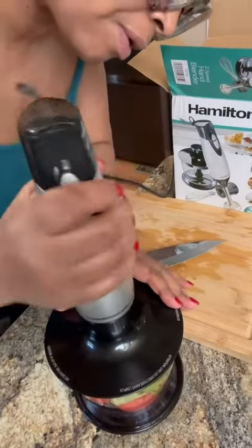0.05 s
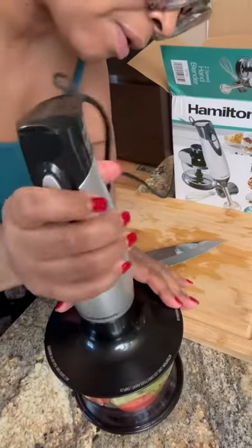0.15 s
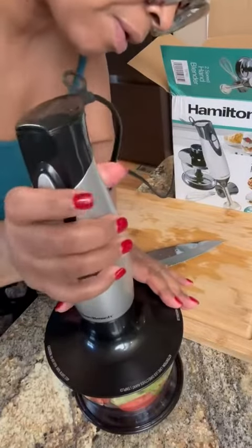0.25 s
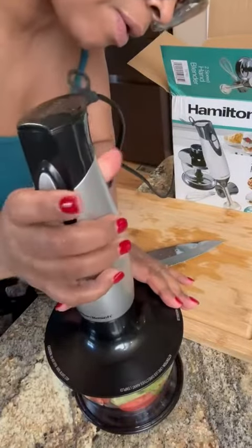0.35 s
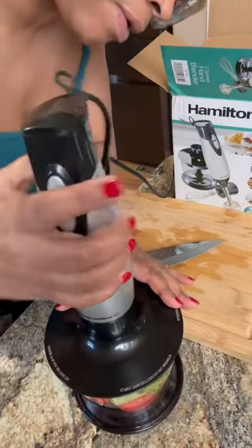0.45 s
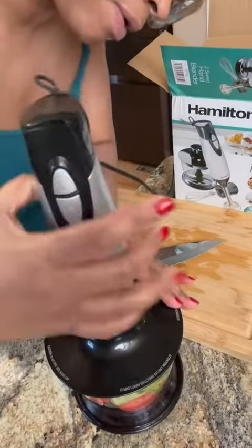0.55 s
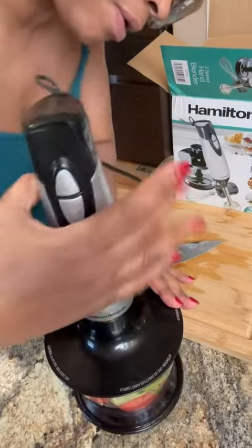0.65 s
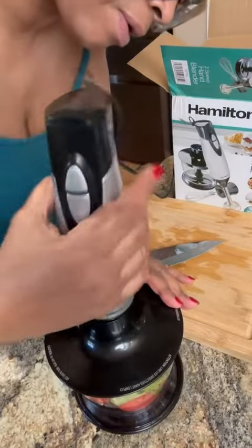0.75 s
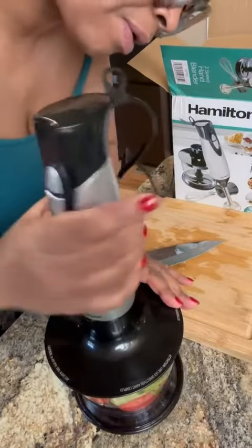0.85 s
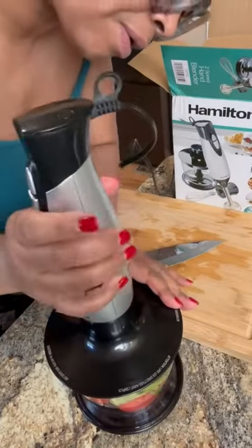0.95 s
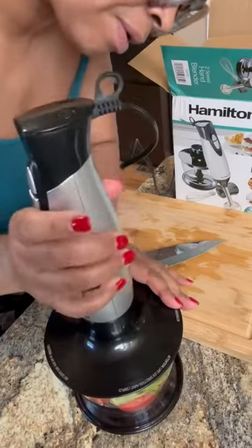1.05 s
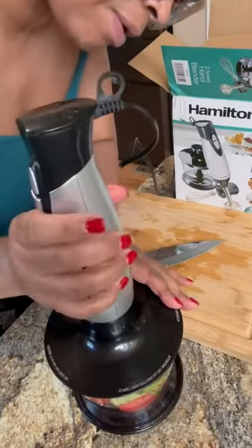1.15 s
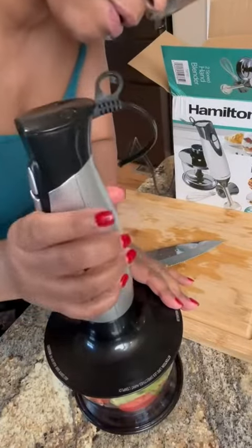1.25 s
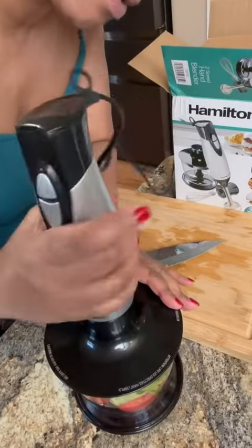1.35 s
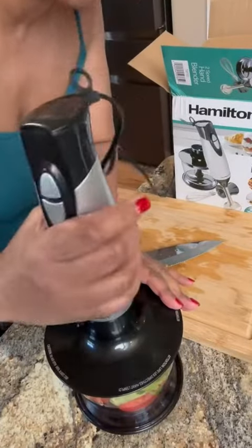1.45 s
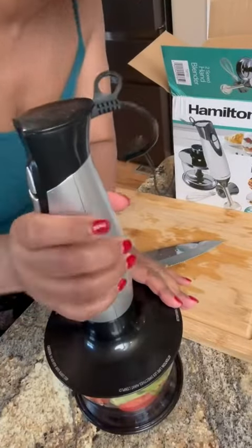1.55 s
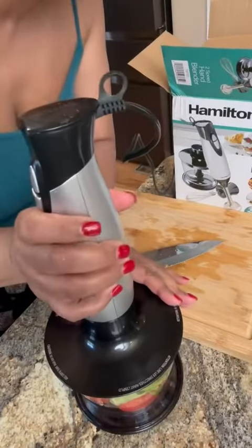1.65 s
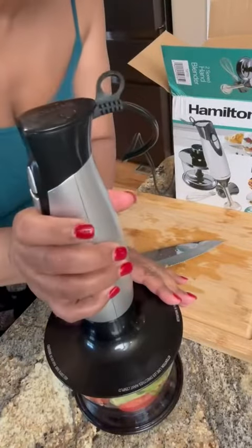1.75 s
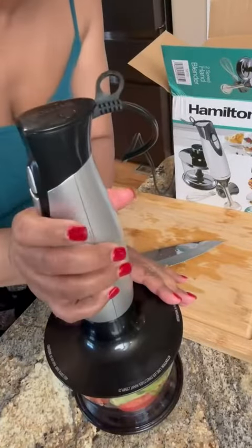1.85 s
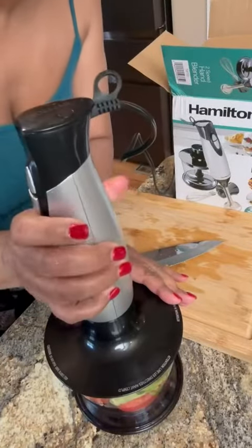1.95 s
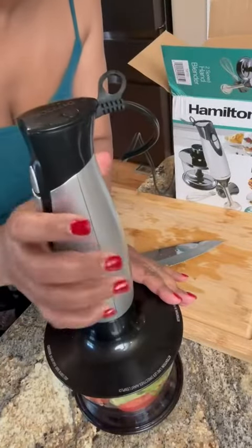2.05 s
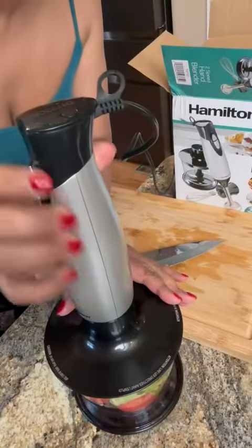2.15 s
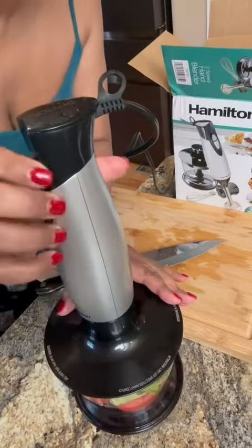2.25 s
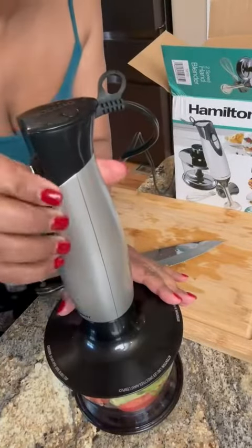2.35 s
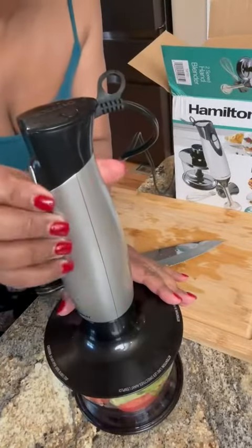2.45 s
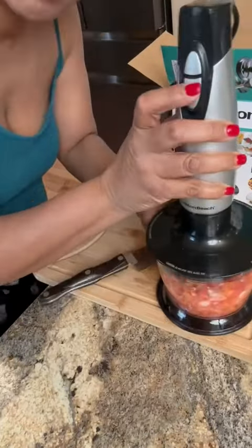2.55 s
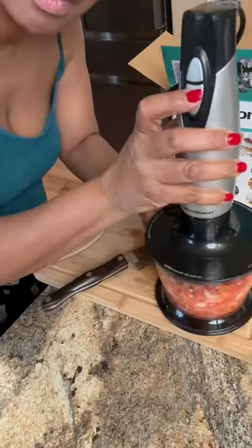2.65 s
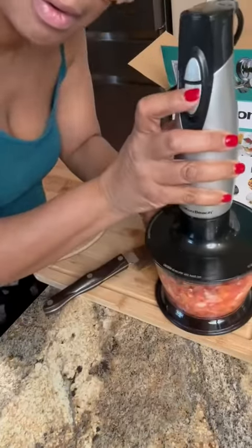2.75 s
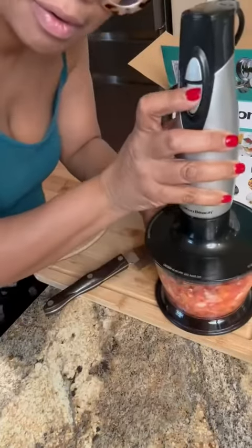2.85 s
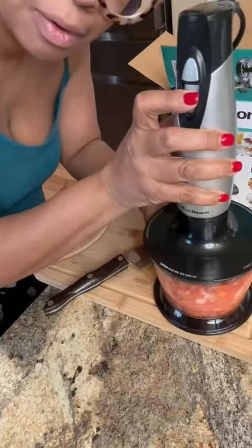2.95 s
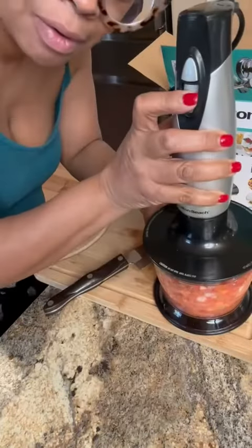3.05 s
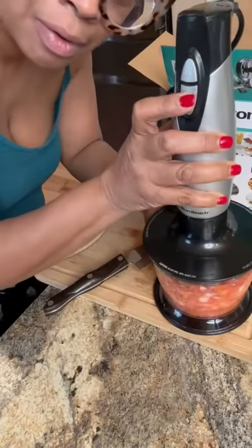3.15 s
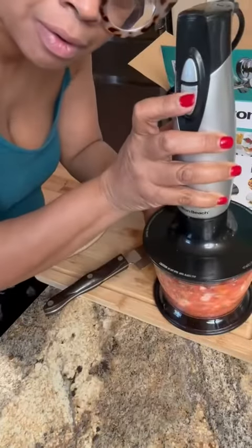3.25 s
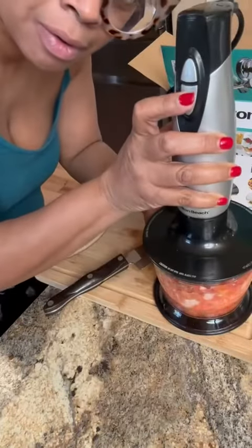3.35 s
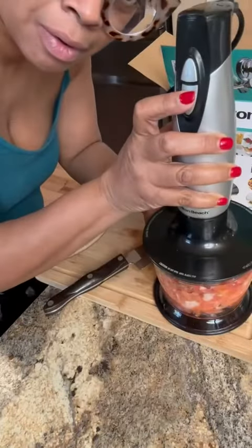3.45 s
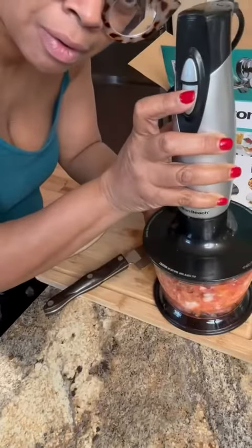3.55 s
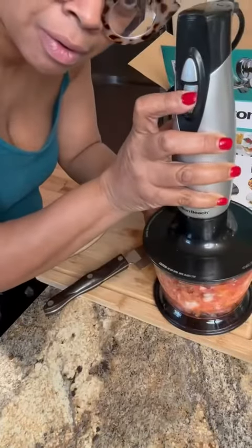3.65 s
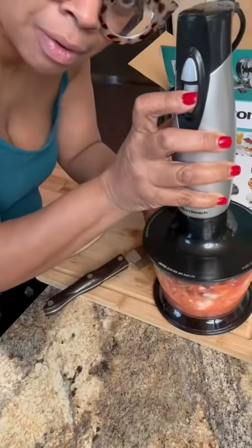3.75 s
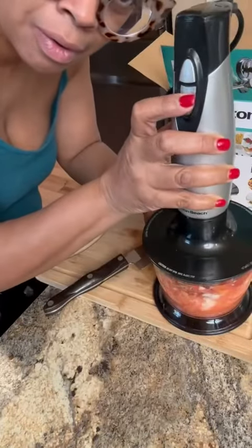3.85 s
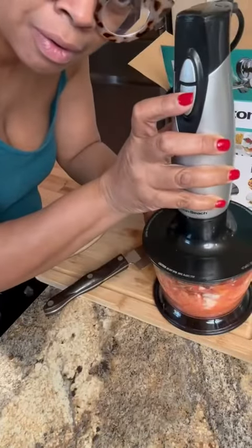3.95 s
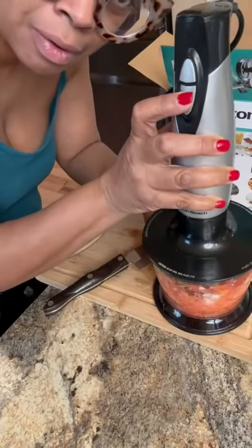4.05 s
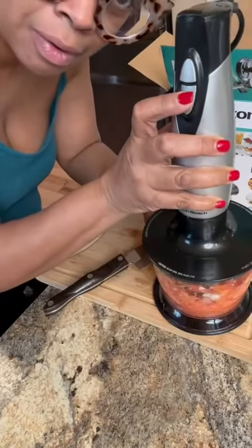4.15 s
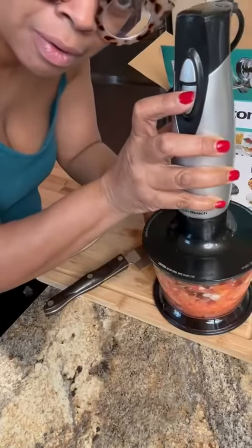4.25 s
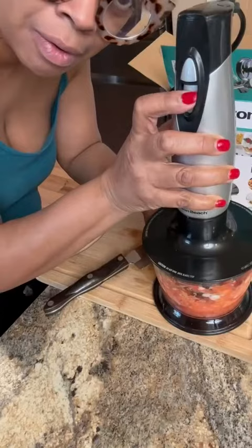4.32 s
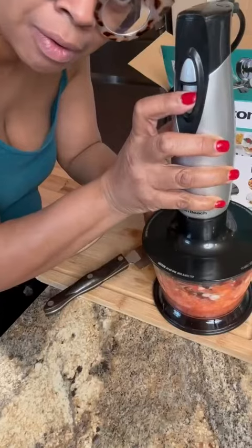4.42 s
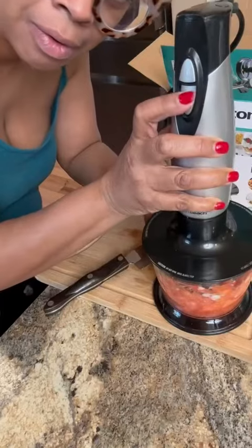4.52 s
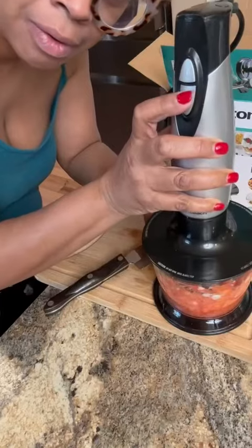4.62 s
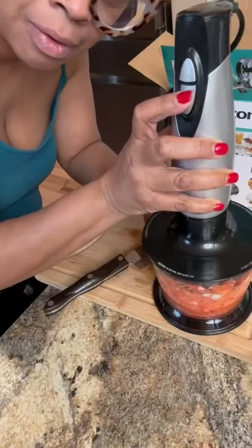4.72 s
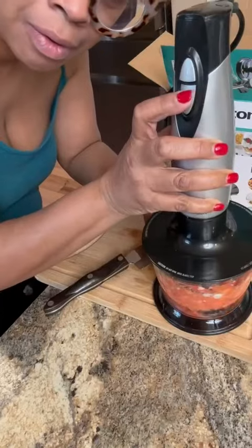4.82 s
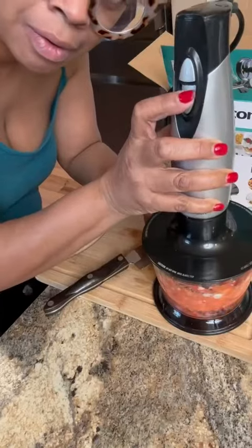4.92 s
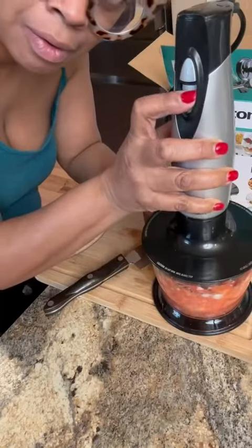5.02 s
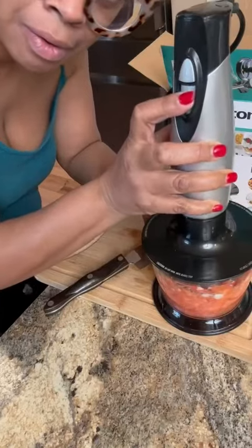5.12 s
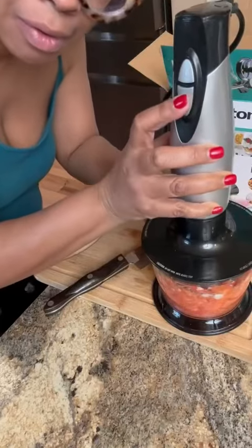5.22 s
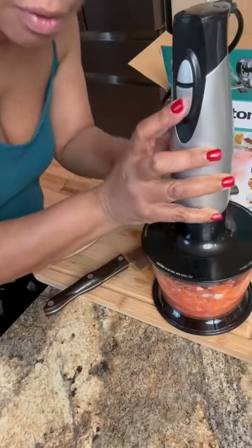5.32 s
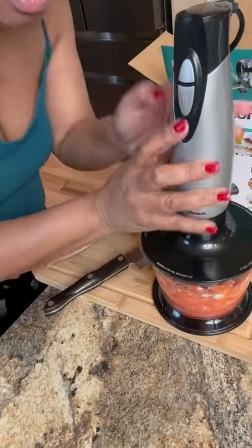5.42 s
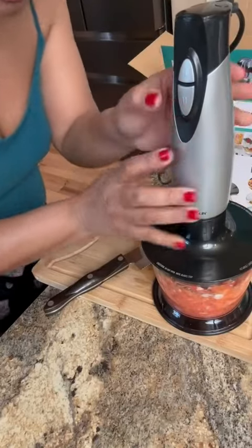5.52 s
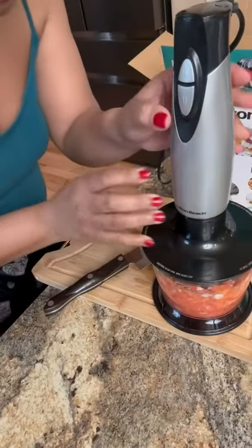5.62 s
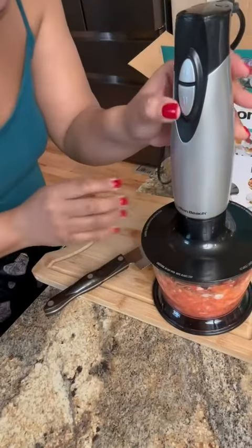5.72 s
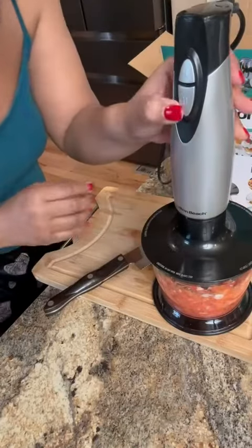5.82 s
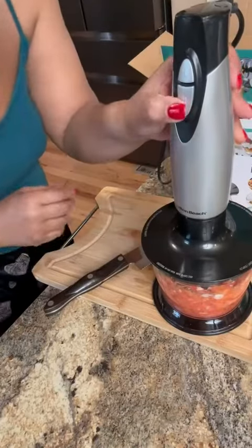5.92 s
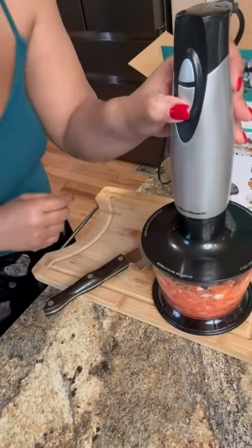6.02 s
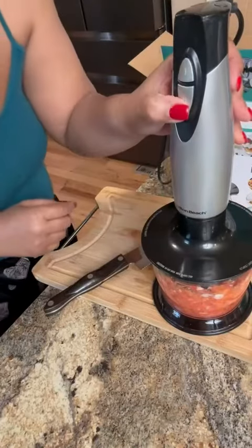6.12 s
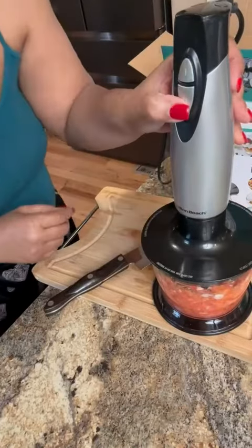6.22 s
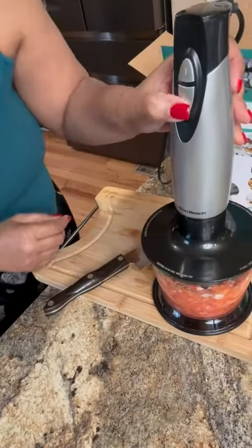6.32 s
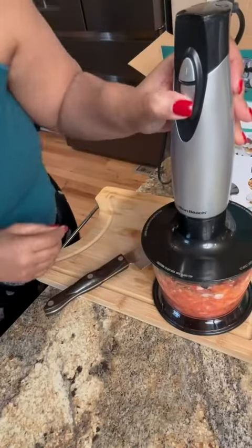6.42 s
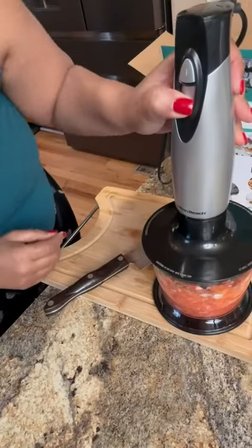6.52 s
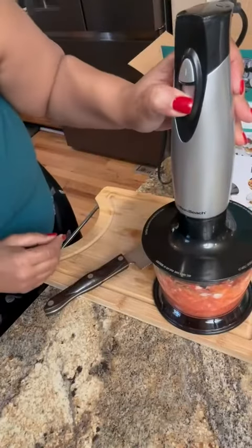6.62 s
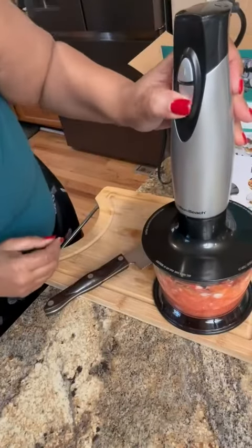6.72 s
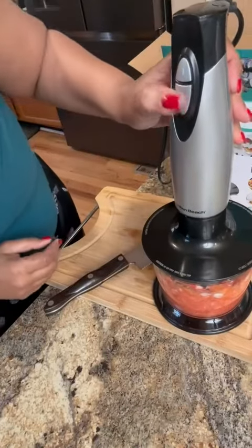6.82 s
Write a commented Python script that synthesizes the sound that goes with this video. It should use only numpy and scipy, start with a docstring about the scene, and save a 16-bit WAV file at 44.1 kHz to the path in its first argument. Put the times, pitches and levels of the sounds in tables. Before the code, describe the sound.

Close in a small kitchen, hands rub a plastic housing, then a hand blender knocks sharply onto its chopper lid, with the wooden board thumping beneath. After a pause, the motor pulses five times: switch click, rough lurch, clattering gears and blade, chunks hitting the bowl, then a slowing flutter. The fifth pulse follows a longer gap. Close stereo phone microphones, short room tail, faint hush.

```python
"""A small kitchen: a hand blender is twisted and knocked onto the lid of its chopper bowl, on a wooden board.
Then the motor is pulsed five times: random impacts through the bowl's resonances give gear and blade clatter,
filtered bursts give chunks on the wall, low tones give hum and rocking, and each run coasts down.
Near sounds, counter reflections, room tail and a faint hush reach two closely spaced phone microphones."""
import sys
import numpy as np
from scipy import signal
from scipy.fft import rfft, irfft
from scipy.io import wavfile
from scipy.ndimage import uniform_filter1d

SR = 44100
rng = np.random.default_rng(int(sys.argv[2]) if len(sys.argv) > 2 else 0)


def wav_out(sig):
    """Save sig, one row per channel (or a flat mono array), as 16-bit PCM at SR to the path in sys.argv[1]."""
    wavfile.write(sys.argv[1], SR, np.round(np.clip(np.atleast_2d(sig).T, -1, 1) * 32767).astype(np.int16))


N = 303408
T = np.arange(N) / SR
HZ = np.arange(N // 2 + 1) * SR / N
SHORT = 8192  # samples in one blow or body response
SHORT_T = np.arange(SHORT) / SR
SHORT_HZ = np.arange(SHORT // 2 + 1) * SR / SHORT + 1


def undb(db):
    """Decibels to gain."""
    return 10 ** (np.asarray(db) / 20)


def unit(x):
    """Scale to rms 1."""
    return x / np.sqrt(np.mean(x ** 2))


def along(points, hz):
    """Read (f/Hz, value) points on a log-frequency axis."""
    f_hz, value = np.transpose(points)
    return np.interp(np.log(np.maximum(hz, 1)), np.log(f_hz), value)


def through(x, h):
    """Pass a sound through an impulse response."""
    return signal.fftconvolve(x, h)[:len(x)]


def band(x, hz, kind, order=2):
    """Butterworth filter."""
    return signal.sosfilt(signal.butter(order, hz, kind, fs=SR, output="sos"), x)


def add(out, t_s, x):
    """Mix a sound in at time t_s."""
    i = max(int(t_s * SR), 0)
    out[i:i + len(x)] += x[:N - i]


def walk(rate):
    """Smooth random wander, rms 1, rate new values a second."""
    k = max(int(SR / rate), 1)
    steps = np.repeat(rng.standard_normal(N // k + 1), k)
    return unit(uniform_filter1d(steps, k)[:N])


def impacts(rate, spread_db):
    """Random clicks of uneven size and sign, rate a second, rms 1."""
    chance = np.clip(rate / SR, 1e-5, 1)
    size = undb(spread_db * np.clip(rng.standard_normal(N), -2, 2)) * rng.choice([-1, 1], N)
    return unit((rng.random(N) < chance) * size / np.sqrt(chance))


def resonance(x, hz, width_hz):
    """A resonance whose centre may move from sample to sample; rms 1."""
    carrier = np.exp(2j * np.pi * np.cumsum(hz) / SR)
    pole = np.exp(-np.pi * width_hz / SR)
    return unit(np.real(carrier * signal.lfilter([1], [1, -pole], x / carrier)))


# low notes bend through the plastic slowly and arrive about this many cycles late
BENDING_CYCLES = 1.575


def response(colour, modes=(), tilt_db=0):
    """Causal impulse response of a body: broad colour, resonances, tilt per octave about 1 kHz; the lows come late."""
    db = along(colour, SHORT_HZ) + tilt_db * np.log2(np.maximum(SHORT_HZ, 250) / 1000)
    for f_hz, width_hz, peak_db in modes:
        db = db + peak_db / (1 + (2 * (SHORT_HZ - f_hz) / width_hz) ** 2)
    # folding the cepstrum gives minimum phase
    cepstrum = irfft(np.log(undb(db)))
    cepstrum[1:SHORT // 2] *= 2
    cepstrum[SHORT // 2 + 1:] = 0
    lag = 2 * np.pi * BENDING_CYCLES * np.log(1 + SHORT_HZ / 50)
    return irfft(np.exp(rfft(cepstrum) - 1j * lag))


def strike(body, chatter_s):
    """A contact that chatters for milliseconds, exciting all pitches nearly alike, and rings a body."""
    envelope = (1 - np.exp(-SHORT_T / .001)) * np.exp(-SHORT_T / chatter_s)
    chatter = rfft(rng.standard_normal(SHORT) * envelope)
    contact = irfft(chatter / np.abs(chatter) ** .88)  # spectrum nearly flattened
    x = through(contact * np.exp(-SHORT_T / .02), body)
    return x / np.sqrt(np.sum(x ** 2) / (chatter_s * SR)) / 4


def diffuse(wide_hz):
    """Stereo noise spectrum of a diffuse field: alike in the bass, less so in the treble."""
    mid, side = rfft(rng.standard_normal((2, N)))
    return mid + side * np.array([[1], [-1]]) * HZ / (HZ + wide_hz)


# broad colour of the quiet kitchen: f/Hz, level/dB
HUSH_COLOUR = [(25, -18), (58, 0), (80, -10), (120, -2), (180, -16), (2000, -23), (6300, -44), (13000, -47)]
HUSH_DB = -63


def hush():
    """The quiet kitchen: low rumble and faint air, each swelling slowly on its own."""
    air = unit(irfft(diffuse(wide_hz=1820) * undb(along(HUSH_COLOUR, HZ)), N))
    rumble = band(air, 250, "lowpass", order=1)
    rest = air - rumble
    return undb(HUSH_DB) * (rumble * undb(2 * walk(rate=6)) + rest * undb(1.8 * walk(rate=4) - .5))


# broad colour of the grip's sliding: f/Hz, level/dB
GRIP_COLOUR = [(45, -7), (115, 11.5), (190, 3.5), (320, 0), (2400, -11), (5000, -25), (13000, -32)]
# grip sliding on the housing: t/s, length/s, level/dB, treble tilt/(dB per octave)
RUBS = [(0, 0.18, -48, 1.5), (0.378, 0.07, -52, -0.5), (0.472, 0.12, -50, -1), (0.623, 0.2, -49, -1.5),
        (1.992, 0.09, -57, -1), (2.21, 0.25, -62, 0.5), (2.563, 0.17, -49.5, -2), (5.55, 0.16, -56, -2.5),
        (5.859, 0.11, -51, .5), (6.388, 0.16, -52, -1)]


def grip():
    """Fingers slip in tiny jerks over the housing; each slide starts briskly and trails away."""
    out = np.zeros(N)
    slips = impacts(rate=900, spread_db=2) * undb(2.5 * walk(rate=45))
    for t_s, length_s, db, tilt_db in RUBS:
        part = np.maximum(T - t_s, 0) / length_s
        slide = unit(through(slips, response(GRIP_COLOUR, tilt_db=tilt_db)))
        out += slide * undb(db) * 2 * np.sqrt(part) * np.exp(-2 * part ** 2)
    return out


# loaded board on the counter: f/Hz, level/dB, t60/s
BOARD_MODES = [(59, -18, 0.39), (120.3, 4.5, 0.17), (191, -2, 0.16), (285, -1.5, 0.081), (391, -7, 0.16)]


def board(push_s):
    """The board's modes after a push, peak 1; a longer push favours the lowest."""
    ring = np.zeros(SHORT)
    for f_hz, db, t60_s in BOARD_MODES:
        ring += undb(db) * np.sin(2 * np.pi * f_hz * SHORT_T) * undb(-60 * SHORT_T / t60_s)
    x = through(ring, SHORT_T * np.exp(-SHORT_T / push_s))
    return x / np.max(np.abs(x))


# soft bumps of the hand through bowl and board: t/s, level/dB
BUMPS = [(0.004, -33.5), (0.051, -25.5), (0.382, -39.5), (1.096, -36.5), (2.199, -45), (2.572, -38.5),
         (2.643, -37), (5.933, -44.5)]


def bumps():
    """The hand's soft pushes ring the board."""
    out = np.zeros(N)
    for t_s, db in BUMPS:
        add(out, t_s, undb(db) * board(push_s=0.00084))
    return out


# broad colour of knocks and ticks on the plastic: f/Hz, level/dB
KNOCK_COLOUR = [(60, -11.5), (200, 1), (450, -4), (900, -8), (3500, -8), (6000, -8.5), (8500, -24),
                (12000, -11), (15500, -25)]


def tick(db):
    """A small hard contact on the housing, bright by its upward tilt."""
    return undb(db) * strike(response(KNOCK_COLOUR, tilt_db=7.0), chatter_s=0.0043)


# fingernails on the housing: t/s, level/dB
TICKS = [(0.045, -48), (.369, -48), (1.942, -57), (2.387, -55), (2.638, -44.5), (3.296, -29), (5.699, -55)]


def nails():
    """Fingernails tick on the housing."""
    out = np.zeros(N)
    for t_s, db in TICKS:
        add(out, t_s, tick(db))
    return out


# plastic parts knocking together: t/s, level/dB, treble tilt/(dB per octave), ring f/Hz, board thump/dB
KNOCKS = [(0.501, -21, -4, 2120, -30.5), (0.601, -25.5, -5, 1190, -38.5), (0.668, -30.5, -2.5, 1170, -37),
          (0.790, -14.5, -5.5, 1040, -28.5), (0.8303, -9, -4, 910, -22), (0.869, -6.5, -1.5, 320, -24),
          (0.8777, -0.5, -2, 1200, -27), (0.8793, 0, -2.5, 2000, -16.5), (0.854, -21.5, -2.5, 1500, -36.5),
          (1.253, -29, -2.5, 754, -39.5), (1.2904, -5, -1, 1000, -18.5), (1.301, -11.5, 1, 450, -31),
          (1.458, -17.5, -3, 950, -31), (1.492, -16.5, -3, 1350, -26), (1.5309, -1.5, -2, 1640, -15.5),
          (2.034, -25, -6.5, 784, -41)]
# resonances of lid and motor unit: f/Hz, width/Hz, level/dB
SHELL_MODES = [(680, 100, 6), (1030, 120, 4), (1560, 120, 4), (1800, 140, 5), (2546, 200, 5),
               (3400, 300, 3)]
# harder blows chatter longer: decay at 0 dB, power of the strength; the board answers later
CHATTER_S, CHATTER_POWER, BOARD_LAG_S = .0022, .3, .003
# parts scuff just before they meet and buzz on briefly
SCUFF_S, RATTLE_S, RATTLE_DB = .007, .021, -23.5
# the struck spot brings out its own resonance
SPOT_DB, SPOT_WIDTH_HZ = 9, 380


def knocks():
    """The motor unit knocks onto the lid, loose parts buzz briefly and the board thumps under it."""
    out = np.zeros(N)
    for t_s, db, tilt_db, ring_hz, thump_db in KNOCKS:
        shell = response(KNOCK_COLOUR, SHELL_MODES + [(ring_hz, SPOT_WIDTH_HZ, SPOT_DB)], tilt_db)
        buzz = unit(through(rng.standard_normal(SHORT), shell))
        buzz = buzz * (1 - np.exp(-SHORT_T / SCUFF_S)) ** 2 * np.exp(-SHORT_T / RATTLE_S)
        add(out, t_s - SCUFF_S, undb(db + RATTLE_DB) * buzz)
        add(out, t_s, undb(db) * strike(shell, CHATTER_S * undb(db) ** CHATTER_POWER))
        add(out, t_s + BOARD_LAG_S, undb(thump_db) * board(push_s=0.0006))
    return out


# trigger presses: t/s, held/s, spin-up/s, coasting/s, run level/dB, food churning/dB, rocking/dB,
# starting lurch/dB, switch click/dB
RUNS = [(2.889, 0.25, 0.0179, 0.46, -1.5, 4, 3.5, -27.5, -27.5),
        (3.632, 0.2, .017, 0.54, -1, 4.5, 2.5, -28.5, -23.5),
        (4.265, 0.2, 0.025, 0.52, -1.5, 4, 4, -34.5, -24),
        (4.928, 0.18, 0.0218, 0.55, -0.5, 0.5, 4, -34, -26.5),
        (6.465, 0.26, .016, 0.48, -3, -3.5, -2, -33, -27.5)]


def switch():
    """The switch clicks at each press."""
    out = np.zeros(N)
    for t_s, *_, click_db in RUNS:
        add(out, t_s, tick(click_db))
    return out


def lurch():
    """At each start the blade shoves the resting food: a rough low groan that drops in pitch."""
    out = np.zeros(N)
    hz = (195 + 330 * np.exp(-SHORT_T / .009)) * (1 + .25 * walk(rate=400)[:SHORT])
    groan = np.sin(2 * np.pi * np.cumsum(hz) / SR) * undb(4 * walk(rate=300)[:SHORT])
    shove = SHORT_T / .022 * np.exp(1 - SHORT_T / .022)
    for t_s, *_, lurch_db, _ in RUNS:
        add(out, t_s, undb(lurch_db) * groan * shove)
    return out


# full speed; food brakes a fast rotor more: power 1 slows evenly, more leaves a longer tail
ROTOR_HZ, COAST_POWER = 208, 2.2


def rotor(age_s, held_s, spin_up_s, coast_s):
    """Share of full speed: quick spin-up while held, then friction and food bring the rotor to rest."""
    spin_up = (1 - np.exp(-age_s / spin_up_s)) ** 2
    return spin_up * np.clip(1 - (age_s - held_s) / coast_s, 0, 1) ** COAST_POWER


# broad colour of the bowl: f/Hz, level/dB
BOWL_COLOUR = [(55, -3), (100, 4.5), (200, -3), (750, -5), (1150, -4), (1600, -1.5), (2700, -8), (4200, -7),
               (4750, -18), (5600, -7.5), (8600, -25), (13000, -14), (15300, -72.5)]
# resonances of bowl, lid and motor housing: f/Hz, width/Hz, level above the broad colour/dB
BOWL_MODES = [(215.2, 76, 8.5), (520, 70, 6), (1710, 740, 0), (2030, 90, 6), (2148, 32, 11.5),
              (2323, 19, 11.5), (2450, 72, 9), (2923, 40, 10), (3370, 32, 9.5)]


def rattle(bowl, speed, load):
    """Blade blows fill the bowl's lows, gear teeth its highs; slower blows lose their upper mids."""
    blade = impacts(600 + 900 * speed, spread_db=2.5) + .4 * rng.standard_normal(N)
    teeth = impacts(600 + 3000 * speed, spread_db=-0.5) + rng.standard_normal(N)
    low = unit(band(through(blade * load, bowl), 1870, "lowpass", order=4))
    high = unit(band(through(teeth * np.sqrt(load), bowl), 2475, "highpass", order=4))
    dull = band(low, 900, "lowpass", order=1)
    return dull + (low - dull) * speed ** .2, high


def churn(bowl, speed):
    """Soft pieces thud against the wall in clumps and ring only its lower resonances."""
    wall = band(bowl, [450, 950], "bandpass", order=2)
    thuds = impacts(60 + 500 * speed, spread_db=3.5) * undb(3.3 * walk(rate=35))
    return speed ** .3 * unit(through(thuds, wall))


# air pockets between food and wall: f/Hz, level/dB
POCKETS = [(400, -0.5), (660, 1.5), (810, 1), (1330, 3), (1580, 4.5), (2430, 3)]
POCKET_WIDTH_HZ, POCKET_DRIFT, POCKET_FLICKER_DB, POCKETS_DB = 30, .03, 4, -2.5


def pockets(speed):
    """Blade strokes ring air pockets; each drifts in pitch and level, and all fade as the swirl dies."""
    strokes = impacts(150 + 500 * speed, spread_db=3)
    out = np.zeros(N)
    for f_hz, db in POCKETS:
        level = undb(db + POCKET_FLICKER_DB * walk(rate=24))
        drift_hz = f_hz * (1 + POCKET_DRIFT * walk(rate=14))
        out += level * resonance(strokes, drift_hz, POCKET_WIDTH_HZ)
    return np.sqrt(speed) * unit(out)


# tooth rate at full speed, level against the clatter, pitch roughness as a share
MESH_HZ, MESH_DB, MESH_ROUGH = 1542, -9, 0.019


def whine(speed):
    """Gear teeth whine with the rotor, smeared by the jerks of the load."""
    jerks = 1 + MESH_ROUGH * (walk(rate=250) + walk(rate=36))
    mesh = 2 * np.pi * np.cumsum(MESH_HZ * speed * jerks) / SR
    return undb(MESH_DB + 2.0 * walk(rate=94)) * speed ** 2 * np.sin(mesh)


UNBALANCE_DB = -36.5  # at full speed


def hum(speed, turn):
    """The unbalanced load hums once a turn."""
    return undb(UNBALANCE_DB + 0.57 * walk(rate=68)) * speed ** 2 * np.sin(turn)


# uneven load sets the bowl shuddering on the board: peak t/s, level/dB
SHUDDERS = [(3.27, -31), (3.69, -30), (4.62, -38.5), (6.515, -21.5), (6.654, -23.5)]
SHUDDER_S = 0.025


def rock(level):
    """The unbalanced load shakes the bowl near a resonance of the board, with brief shudders."""
    for t_s, db in SHUDDERS:
        level = level + undb(db) * np.exp(-((T - t_s) / SHUDDER_S) ** 2)
    return level


def rocking_tone(speed):
    """The shaking's wavering low pitch, a little higher with speed."""
    return np.sin(2 * np.pi * np.cumsum(112 + 9 * speed + 3 * walk(rate=42)) / SR)


# lowest resonance of bowl and board, range of rotor speeds that drive it, level
SWAY_HZ, SWAY_RANGE_HZ, SWAY_DB = 58, 30, -39


def sway(speed):
    """The bowl sways on the board, most as the rotor passes their lowest resonance."""
    passing = np.exp(-((ROTOR_HZ * speed - SWAY_HZ) / SWAY_RANGE_HZ) ** 2)
    ring = resonance(rng.standard_normal(N), np.full(N, SWAY_HZ), width_hz=4.2)
    return undb(SWAY_DB) * uniform_filter1d(passing, SHORT // 2) * ring


# big chunks striking the bowl wall: t/s, level/dB, ring f/Hz
CHUNKS = [(2.930, -8, 264), (3.093, -8.5, 800), (3.147, -8, 720), (3.393, -15, 650), (3.638, -12, 480),
          (3.832, -5, 830), (3.894, -9.5, 800), (3.931, -9, 770), (3.971, -6.5, 620), (4.031, -12, 550),
          (4.109, -16, 786), (4.129, -19, 606), (4.183, -23.5, 620), (4.290, -20, 564), (4.340, -9, 630),
          (4.724, -15, 530), (4.974, -7, 805.6), (5.025, -9.5, 1470), (5.198, -15, 625), (5.347, -15, 750),
          (5.425, -19.5, 600), (5.51, -30, 430)]
# broad colour of a chunk's blow: f/Hz, level/dB
CHUNK_COLOUR = [(150, -6), (850, -6), (1200, -12.5), (2450, -11.5), (3300, -22.5), (13000, -33)]


def chunks():
    """Big chunks strike the bowl wall, each bringing out the resonance of its spot."""
    out = np.zeros(N)
    for t_s, db, ring_hz in CHUNKS:
        spot = response(CHUNK_COLOUR, BOWL_MODES + [(ring_hz, SPOT_WIDTH_HZ, SPOT_DB)])
        add(out, t_s, undb(db) * strike(spot, chatter_s=0.0044))
    return out


# coupling singing at housing resonances: t/s, half length/s, f/Hz, level/dB
SQUEALS = [(6.515, .025, 1980, -34), (6.63, .04, 2910, -33.5), (6.645, .025, 3220, -36),
           (6.68, .06, 4170, -40.5)]


def squeal():
    """The rubbing coupling makes housing resonances swell and fade, rough and unsteady."""
    rub, waver = rng.standard_normal(N), 1 + .004 * walk(rate=30)
    out = np.zeros(N)
    for t_s, half_s, f_hz, db in SQUEALS:
        swell = np.exp(-((T - t_s) / half_s) ** 2)
        out += resonance(rub, f_hz * waver, width_hz=47) * undb(db) * swell
    return out


# layer levels at full speed before each run's own level, and powers of speed
CLATTER_DB, CLATTER_POWER, HISS_DB, HISS_POWER, ROCK_DB = -26.5, 0.84, -29, 1.3, -34.5
# resting food resists more until it swirls
DRAG_DB, DRAG_S = 4, 0.023


def chopper():
    """Rotor speed sets the density and level of gear and blade rattle, and the pitch of whine and hum."""
    speed, clatter, hiss, rocking, food = np.zeros((5, N))
    for t_s, held_s, spin_up_s, coast_s, db, food_db, rock_db, _, _ in RUNS:
        on = T >= t_s
        age_s = T[on] - t_s
        speed[on] = rotor(age_s, held_s, spin_up_s, coast_s)
        drag_db = DRAG_DB * np.exp(-age_s / DRAG_S)
        clatter[on] = undb(CLATTER_DB + db + drag_db) * speed[on] ** CLATTER_POWER
        hiss[on] = undb(HISS_DB + db) * speed[on] ** HISS_POWER
        rocking[on] = undb(ROCK_DB + rock_db) * speed[on]
        food[on] = undb(food_db)
    bowl = response(BOWL_COLOUR, BOWL_MODES)
    # uneven food: flurries; each turn pulses the load: a growl that slows to a flutter
    turn = 2 * np.pi * np.cumsum(ROTOR_HZ * speed * (1 + 0.0299 * walk(rate=64))) / SR
    load = undb(1.8 * speed * walk(rate=55)) * (1 + (.5 - .2 * speed) * np.cos(turn))
    low, high = rattle(bowl, speed, load)
    soft = undb(-7.0) * food * churn(bowl, speed)
    out = clatter * (low + soft + undb(POCKETS_DB) * pockets(speed) + whine(speed))
    out += hiss * high + rock(rocking) * rocking_tone(speed) + hum(speed, turn)
    return out + chunks() + lurch() + sway(speed) + squeal()


def counter(x):
    """First reflections from the counter and things on it, opposite in sign at the two microphones."""
    decay = np.exp(-SHORT_T / 0.025)
    echoes = band(rng.standard_normal(SHORT) * decay, [1500, 12000], "bandpass", order=1)
    return through(x, echoes / np.sqrt(np.sum(echoes ** 2))) * np.array([[1], [-1]])


# decay of the room: f/Hz, t60/s
ROOM_T60 = [(500, 0.56), (2000, 0.68), (6000, 0.48), (14000, 0.39)]


def kitchen(x):
    """Cabinets and tiles return a dense tail that dies band by band."""
    field, out = diffuse(wide_hz=808), 0
    edges_hz = np.r_[0, 250 * 2 ** np.arange(7), SR / 2]
    t = T[:SR * 3 // 4]
    for lo, hi in zip(edges_hz[:-1], edges_hz[1:]):
        noise = irfft(field * ((HZ >= lo) & (HZ < hi)), N)[:, :len(t)]
        out = out + noise * np.exp(-np.log(1000) * t / along(ROOM_T60, (lo + hi) / 2))
    tail = out * (1 - np.exp(-t / 0.00059))
    return np.array([through(x, h / np.sqrt(np.sum(h ** 2))) for h in tail])


# phase by which the left microphone leads the right: f/Hz, phase/rad
PORT_PHASE = [(3000, .05), (4000, -.2), (6300, -2), (7000, -3.05), (8800, -3.25), (11000, -6.2),
              (13000, -6.5), (14200, -9.2)]
# balance of the microphones: f/Hz, left minus right/dB
PORT_BALANCE = [(60, -.3), (450, -1.4), (2400, 0)]


def ports(x):
    """Two microphones hear near sounds about equally loud but out of phase in the treble."""
    half = undb(along(PORT_BALANCE, HZ) / 2) * np.exp(1j * along(PORT_PHASE, HZ) / 2)
    return irfft(rfft(x) * np.array([half, 1 / half]), N)


def scene():
    """Handling and chopping close by, first reflections, the kitchen's echo and its faint hush."""
    hands = grip() + bumps() + nails() + knocks() + switch()
    motor = chopper()
    near = hands + motor
    early = undb(-11) * counter(near)
    late = kitchen(undb(-14) * hands + undb(-21.5) * motor)
    return ports(near + early + late + hush())


TOP_HZ = 15300


def record(dry):
    """The phone cuts the rumble, rounds the highest peaks and cuts the top."""
    x = np.tanh(1.083 * band(dry, 53, "highpass", order=5)) / 0.59
    return signal.sosfilt(signal.ellip(8, .2, 70, TOP_HZ, fs=SR, output="sos"), x)


dry = scene()
out = record(dry)
wav_out(out)
```